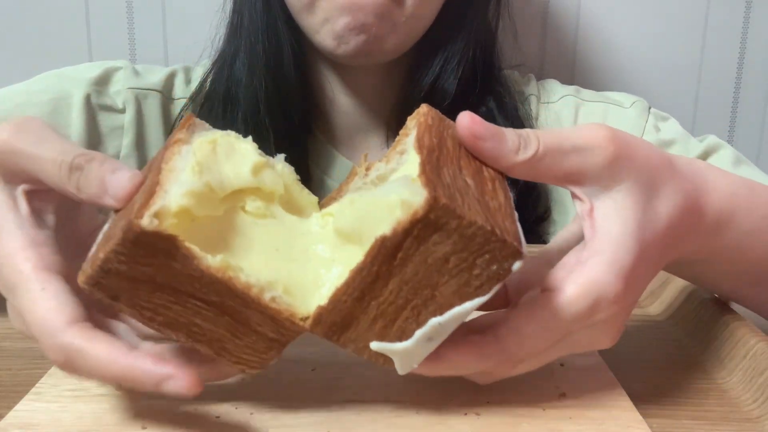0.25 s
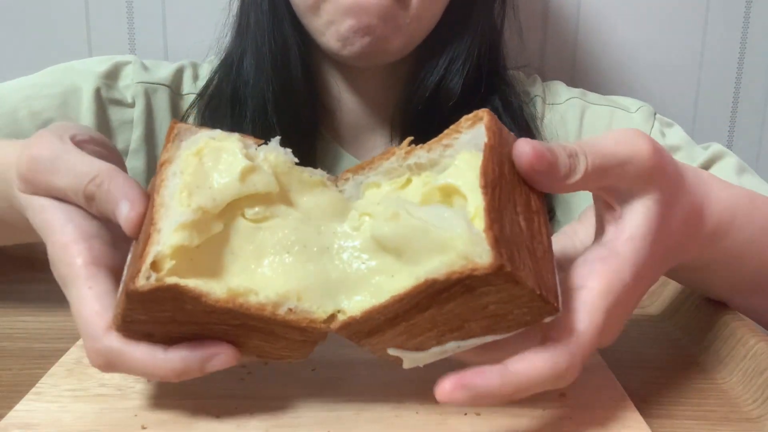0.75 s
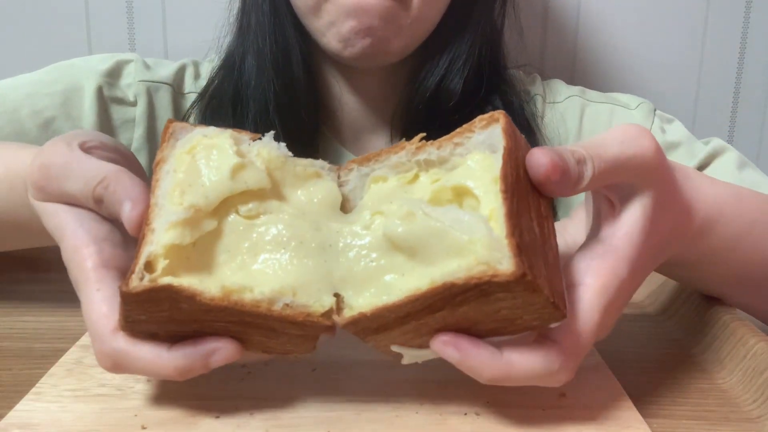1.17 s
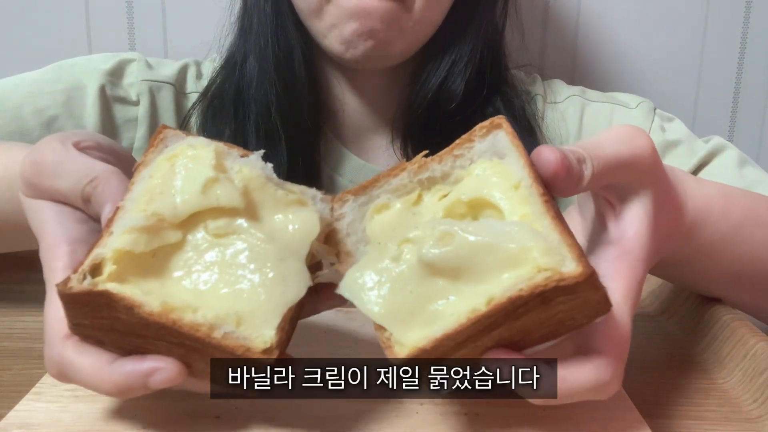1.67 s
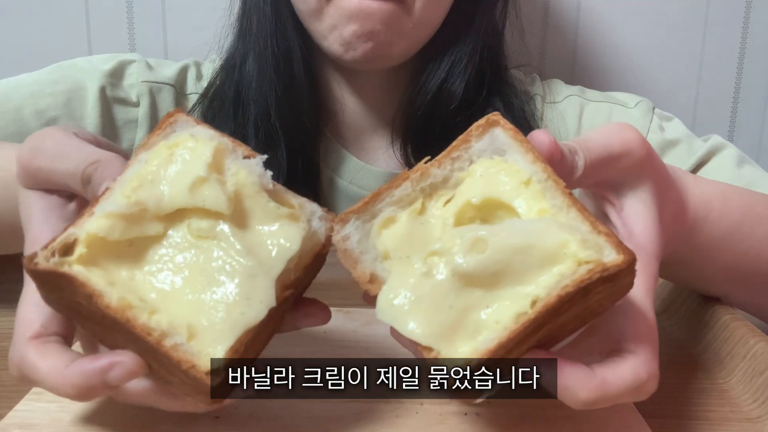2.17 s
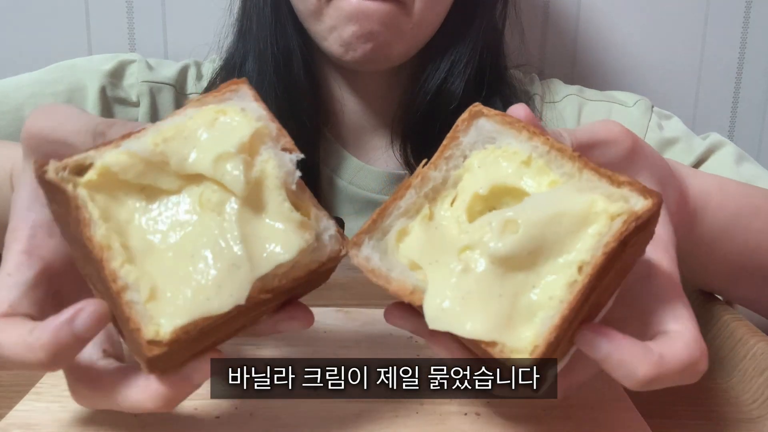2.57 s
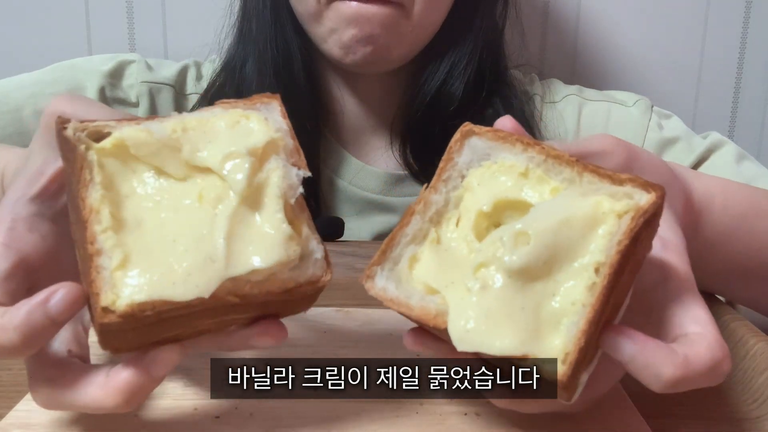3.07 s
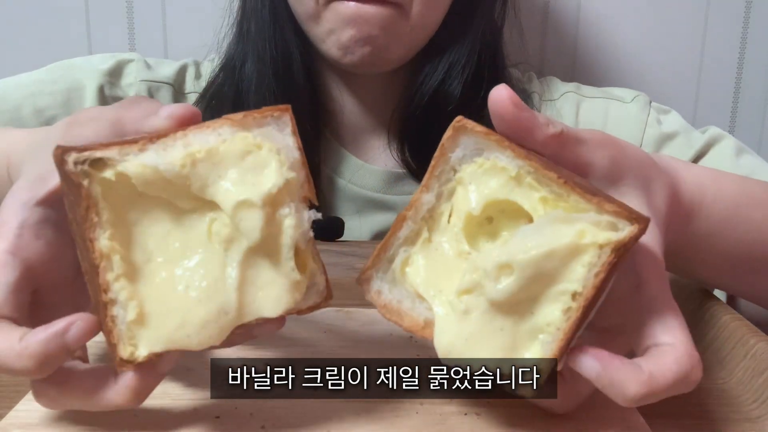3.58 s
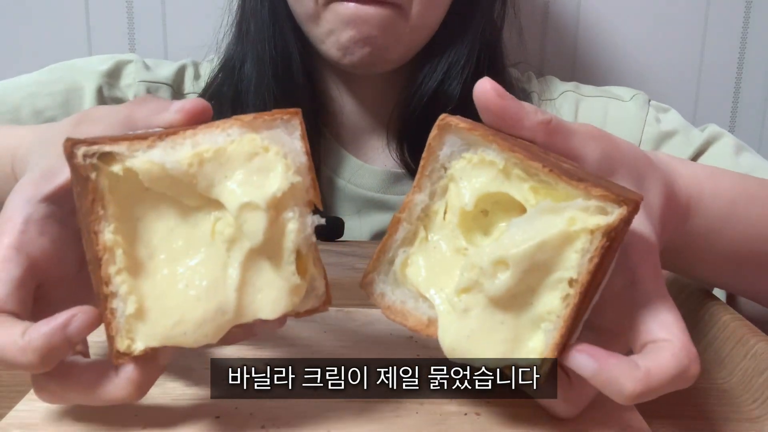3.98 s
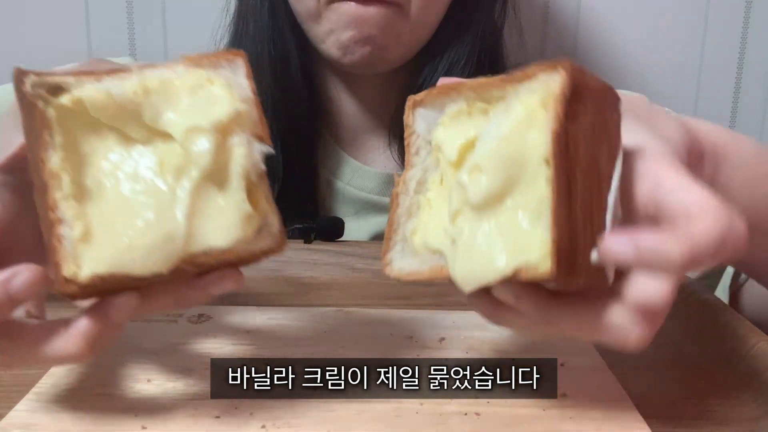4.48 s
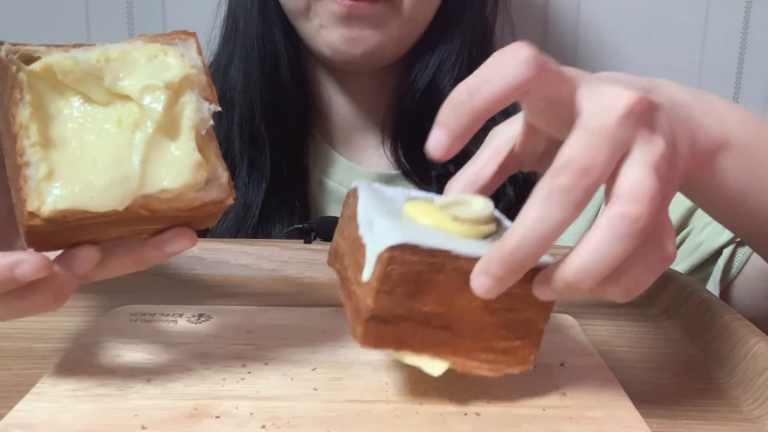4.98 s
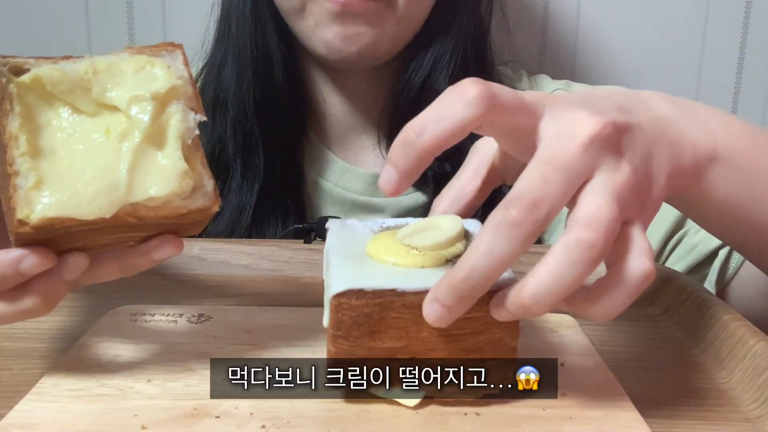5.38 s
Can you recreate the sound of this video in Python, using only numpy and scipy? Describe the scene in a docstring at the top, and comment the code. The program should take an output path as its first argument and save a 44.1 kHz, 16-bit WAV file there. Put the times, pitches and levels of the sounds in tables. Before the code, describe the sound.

Quiet indoor close-up of crisp crust breaking. After a light early click with a soft bump, crackling swells sharply, peaks, and continues in scattered snaps before thinning out. A brief duller crunch comes past three seconds; near the end, fingers slide faintly over crust with two tiny ticks. Very soft, regular clock ticks and low room rumble with thin hiss lie underneath throughout.

```python
"""A quiet room: over a wooden board, close by, a flaky, cream-filled pastry is pulled apart by hand.
Crust snaps and tears are minimum-phase clicks, single or massed; sliding fingers are shaped noise.
A wall clock, ticking about once a second, is a set of damped modes struck by runs of gear blows.
A soft bump is a short sine; deep rumble, a wavering low hum and steady hiss are filtered noise."""
import sys
import numpy as np
from scipy import signal
from scipy.fft import rfft, irfft
from scipy.io import wavfile
from scipy.ndimage import uniform_filter1d

SR = 44100
rng = np.random.default_rng(int(sys.argv[2]) if len(sys.argv) > 2 else 0)


def output_pcm(signal):
    """Save a mono or channel-first signal as 16-bit PCM at the path in sys.argv[1].

    Samples are clipped to [-1, 1] before scaling.
    """
    pcm = np.clip(np.atleast_2d(signal).T, -1, 1) * 32767
    wavfile.write(sys.argv[1], SR, np.round(pcm).astype(np.int16))


def how_loud(loudness_db):
    """Turn decibels into a plain amplitude multiplier (0 dB gives 1, 20 dB gives 10)."""
    steps = np.asarray(loudness_db, float) / 20
    return 10 ** steps


N = 248724  # samples

# Colour that the hollow crust gives every break and the hiss of a slide: f/Hz, level/dB
CRUST_COLOUR = [(250, 15), (750, 8.5), (1600, 3.5), (2100, 1.5), (2600, -10), (3200, 0), (3900, -3),
                (4800, 0), (5800, 0.5), (7500, 0), (10500, -2.5), (16000, -9.5)]


def evened(x):
    """Normalisation: scales a signal to unit rms."""
    return x / np.sqrt(np.mean(x ** 2) + 1e-30)


def curve(rows):
    """Linear interpolation: reads a (t/s, value) table at every sample."""
    s, value = np.transpose(rows)
    return np.interp(np.arange(N) / SR, s, value)


def noise(db_at, size=N):
    """Spectral shaping: Gaussian noise of unit rms, its spectrum weighted by db_at(f/Hz) in dB."""
    hz = np.fft.rfftfreq(size, 1 / SR) + .1  # keeps the logarithm finite at 0 Hz
    white = rfft(rng.standard_normal(size))
    return evened(irfft(white * how_loud(db_at(hz)), size))


def spectrum(points):
    """Spectral envelope: interpolates (f/Hz, level/dB) points on a log-frequency axis."""
    f, db = np.transpose(points)
    return lambda hz: np.interp(np.log(hz), np.log(f), db)


def hump(hz, centre_hz, octaves, low=1):
    """Log-Gaussian resonance in dB: 6 dB down at the given octaves; low < 1 softens the lower side."""
    away = np.log2(hz / centre_hz) / octaves
    return -6 * np.where(away < 0, low, 1) * away ** 2


def ring(modes, colour_db, size):
    """Modal superposition: an impulse sets off exponentially damped sines."""
    hz, db, t60 = np.transpose(modes)[:, :, None]
    t = np.arange(size) / SR
    decay = how_loud(db + colour_db[:, None] - 60 * t / t60)
    return (decay * np.sin(2 * np.pi * hz * t)).sum(0)


def add(mix, s, sound):
    """Linear superposition: mixes a sound in at time s."""
    part = mix[round(s * SR):][:len(sound)]
    part += sound[:len(part)]


def room():
    """Stationary noise with amplitude modulation: rumble, a two-band swelling hum and hiss."""
    # Deep rumble: f/Hz, relative spectral density/dB
    rumble_points = [(1, -5), (5, 8.5), (11, 4), (20, -11), (29, -16), (36, -3), (42, -1), (52, -6),
                     (64, -14), (76, -18.5), (115, -25), (150, -33.5), (220, -74)]
    # Hum, lower then upper band: f/Hz, relative spectral density/dB
    hum_bands = [
        [(130, -29.5), (180, 3.5), (225, 6), (290, 2), (360, -28.5)],
        [(300, -15), (370, 1), (440, 0.5), (540, -5), (680, -27)],
    ]
    # Swelling and sinking of the hum, before waver and band balance: t/s, level/dB
    hum_swell = [(0, -80), (.5, -79), (.9, -72.5), (1.15, -72.5), (1.35, -83.5), (1.6, -74), (2.05, -74),
                 (2.35, -81), (2.75, -77.5), (3.05, -85.5), (3.4, -68), (3.6, -75.5), (3.85, -87),
                 (4.08, -71.5), (4.35, -74), (4.65, -83), (5.35, -81.5), (5.64, -73.5)]
    # Hiss: f/Hz, relative spectral density/dB
    hiss_points = [(90, -43), (150, -10), (300, -9), (520, -15), (900, -18), (2000, -22.5), (4000, -25.5),
                   (6000, -25.5), (9000, -26), (12000, -29.5), (15800, -32)]
    rumble_db, hiss_db = -47.5, -72.5
    upper_db, waver_db = -1.5, 1.5  # upper band against lower; rms waver of each band
    hum = 0
    for band, db in zip(hum_bands, (0, upper_db)):
        waver = noise(lambda hz: -hz * 1.2)  # the steep fall leaves only slow change
        hum_gain = how_loud(curve(hum_swell) + db + waver_db * waver)
        hum = hum + hum_gain * noise(spectrum(band))
    rumble = how_loud(rumble_db) * noise(spectrum(rumble_points))
    return rumble + hum + how_loud(hiss_db) * noise(spectrum(hiss_points))


def clock():
    """Forced vibration: each tick is a run of gear blows ringing the case's modes, with a dry rattle."""
    # Modes of the case, before each beat's colouring: f/Hz, level/dB, t60/s
    case_modes = [(781, -4.5, 0.19), (1047, 1, 0.082), (1330, -10, 0.065), (1393, 0.5, 0.083),
                  (1530, -7.5, 0.034), (2038, -3, 0.061), (2400, -11.5, 0.074), (3490, -6.5, .03),
                  (5030, -7, .025), (5900, -13, .03), (7300, -9, 0.02)]
    # Blows of the gear train in one tick, before random scatter: t/s, level/dB
    gear_blows = [(0, -8), (.0022, -3), (.0044, -3.5), (.0089, -1), (.0133, -2), (.0355, -2.5)]
    # The two alternating beats: level/dB, rattle level/dB (relative), brightening/(dB per octave)
    tick_beat = (-66, -4, 1)
    tock_beat = (-70.5, -0.6, 4.8)
    first_s, every_s = .206, 1.0001
    blow_scatter_db, mode_scatter_db = 3.1, 1.2
    delay_s, gear_db = np.transpose(gear_blows)
    mode_hz = np.transpose(case_modes)[0]
    out, t = np.zeros(N), np.arange(4000) / SR
    for beat in range(6):
        db, rattle_db, bright_db = (tick_beat, tock_beat)[beat % 2]
        blows = rng.standard_normal(4000) * how_loud(-21.0 - 60 * t / 0.16)  # a dense, quickly fading burst of small gear blows
        blow_db = gear_db + blow_scatter_db * rng.standard_normal(len(gear_blows))
        blows[[round(d * SR) for d in delay_s]] += how_loud(blow_db)
        colour_db = bright_db * np.log2(mode_hz / 1400)
        colour_db = colour_db + mode_scatter_db * rng.standard_normal(len(case_modes))
        tick = np.convolve(blows, ring(case_modes, colour_db, size=5000))[:4000]
        # the rattle follows the short-time strength of the blows
        burst = abs(uniform_filter1d(blows ** 2, size=150)) ** .5 * how_loud(-60 * t / 0.6)
        rattle = noise(lambda hz: hump(hz, 3670, 1.0), size=4000) * burst / burst.max()
        tick = tick / np.std(tick[:1500])
        add(out, first_s + beat * every_s, how_loud(db) * (tick + how_loud(rattle_db) * rattle))
    return out


def slides():
    """Friction noise: skin on crust gives a grainy hiss and a hollow band that swell and stop."""
    # Strokes: start t/s, end t/s, hiss level/dB, hiss centre f/Hz, half-width/octaves,
    # peak position/fraction of the stroke, hollow level/dB (levels before the stroke's envelope)
    strokes = [(.26, 0.315, -74.5, 7650, 1.6, 0.6, -84), (0.407, .436, -57.5, 6750, 1.1, .75, -64.5),
               (2.569, 2.647, -82, 4000, 1.3, 0.9, -74.5), (3.364, 3.418, -73.5, 10800, .45, .55, -85),
               (4.419, 4.724, -76.5, 6160, 1.8, 1, -89), (4.688, 4.869, -65.5, 15000, 1.4, 0.36, -65.5),
               (5.524, 5.66, -88, 4000, 1.3, 0.4, -76.5)]
    hollow_hz, hollow_octaves = 1260, 1.43
    grain_db, grain_s = 3, 0.048  # unevenness; strokes longer than grain_s are smoother
    out = np.zeros(N)
    for start, end, db, hz, octaves, top, hollow_db in strokes:
        hiss_colour = lambda f: hump(f, hz, octaves) + spectrum(CRUST_COLOUR)(f)
        hiss = how_loud(db) * noise(hiss_colour, size=32768)
        hollow = how_loud(hollow_db) * noise(lambda f: hump(f, hollow_hz, hollow_octaves), size=32768)
        unevenness = evened(uniform_filter1d(rng.standard_normal(32768), size=130))
        grain = how_loud(grain_db * min(grain_s / (end - start), 1) ** .5 * unevenness)
        u = np.linspace(0, 1, round((end - start) * SR))
        peak_at = np.clip(top, .2, .85)
        stroke = np.interp(u, [0, .12, peak_at, .92, 1], [0.37, 0.57, 0.96, 0.46, 0.24])
        add(out, start, stroke * ((hiss + hollow) * grain)[:len(u)])
    return out


def bump():
    """Windowed oscillation: a half-sine envelope on a low sine, a soft push as the grip shifts."""
    start_s, length_s, peak_db, hz = .404, 0.038, -59.5, 242.4
    out, t = np.zeros(N), np.arange(0, length_s, 1 / SR)
    envelope = np.sin(np.pi * t / length_s)
    add(out, start_s, how_loud(peak_db) * envelope * np.sin(2 * np.pi * hz * t))
    return out


def flake(centre_hz, octaves, chance):
    """Minimum-phase impulse response: one flake's dry click, rippled in colour by its own shape."""
    hz = np.fft.rfftfreq(512, 1 / SR) + 40
    ripple_db = 3.3 * np.interp(np.log(hz / 500), np.linspace(0, 3.5, len(chance)), chance)
    colour_db = spectrum(CRUST_COLOUR)(hz) + hump(hz, centre_hz, octaves, low=0.72) + ripple_db
    log_gain = np.log(how_loud(np.maximum(colour_db, -70)))
    # folding the cepstrum onto positive time makes the click causal
    cepstrum = irfft(log_gain) * np.r_[1, 2 * np.ones(255), 1, np.zeros(255)]
    click = irfft(np.exp(rfft(cepstrum)))[:400]
    return click / abs(click).max()


def snaps():
    """Brittle fracture: a flake snaps, then decaying random impulses are the crumbs rattling."""
    # The loudest snaps: t/s, first click's peak level/dB, centre f/Hz before crust colour,
    # half-width/octaves
    snap_rows = [(0.407, -40, 4840, 1.6), (0.4522, -56, 3000, 1.1), (0.4936, -61, 1960, .6),
                 (0.764, -57, 7390, 1.3), (0.801, -59, 3470, 0.38), (1.1255, -55, 8000, 0.9),
                 (1.146, -54, 5900, 1.2), (1.166, -53, 6280, 0.73), (1.175, -47.5, 5100, 1.1),
                 (1.1896, -37.5, 3800, 1.6), (1.218, -39, 6200, 1.1), (1.226, -45, 4500, 0.99),
                 (1.2352, -31, 4300, 1.25), (1.2442, -43, 3190, 1.6), (1.2525, -41.5, 4040, .8),
                 (1.2601, -31.5, 3720, .55), (1.2677, -39.5, 2480, 1), (1.2704, -39, 3810, 1.8),
                 (1.2975, -40.5, 5940, 0.88), (1.3083, -49, 3930, 0.86), (1.3335, -45.5, 6000, 1.5),
                 (1.3365, -48.5, 4500, 0.65), (1.398, -59, 5000, 0.69), (1.42, -52, 4310, 1),
                 (1.441, -50.5, 4700, 0.94), (1.46, -53.5, 4910, 1.2), (1.5624, -42.5, 2700, 1.3),
                 (1.601, -57, 1900, 0.96), (1.61, -34, 2120, 1.28), (1.614, -42, 3500, 1.7),
                 (1.6255, -47, 3350, 1.7), (1.6388, -53, 1520, 1.2), (1.662, -43, 1320, 0.95),
                 (1.671, -37.5, 3040, 1.6), (1.6976, -47.5, 2890, 1.2), (1.7299, -44.5, 3780, 1.9),
                 (1.7437, -48.5, 5460, 1.7), (1.7588, -54, 7090, 0.88), (1.849, -48, 8700, .4),
                 (1.9308, -52, 3700, .7), (1.9504, -35, 3060, 1.21), (2.0994, -49, 6350, 0.96),
                 (2.2877, -55, 5000, 1.5), (2.2932, -51, 3500, 1.6), (2.6855, -44, 2400, 1.2),
                 (3.0984, -45.5, 7800, 0.84), (3.3118, -40, 1520, 0.96), (3.3213, -48.5, 1140, 0.37),
                 (3.4867, -56, 10860, 0.22), (4.6725, -48.5, 5600, 0.38), (4.7533, -52, 5520, 0.41)]
    crumbs_db, crumbs_spread_db, crumbs_t60_s = -9.5, 2.2, .013  # levels against the snap
    out, t = np.zeros(N), np.arange(800) / SR
    for s, db, hz, octaves in snap_rows:
        # cubing makes a few crumbs stand out
        crumbs = rng.standard_normal(800) ** 3 * how_loud(-60 * t / crumbs_t60_s)
        crumb_gain = how_loud(crumbs_db + crumbs_spread_db * rng.standard_normal())
        breaks = np.r_[1, crumb_gain * crumbs / np.linalg.norm(crumbs)]
        click = flake(hz, octaves, rng.standard_normal(16))
        add(out, s, how_loud(db) * np.convolve(breaks, click))
    return out


def tears():
    """Shot noise: many small flakes, a few larger, break at random while a layer tears."""
    # Tears: loudest t/s, rms level there/dB, build-up/s, dying-away/s, centre f/Hz before
    # crust colour, mean rate/(flakes per s)
    tear_rows = [(1.235, -64, .12, 0.28, 3850, 1200), (1.26, -51, .035, 0.021, 3680, 1650),
                 (1.69, -64.5, .07, 0.046, 3000, 700), (3.314, -58.5, .003, 0.089, 1160, 3400)]
    range_db = 24.5  # climb in the build-up and fall in the dying-away
    out, span = np.zeros(N), 16384
    for top_s, db, rise_s, fall_s, hz, per_s in tear_rows:
        crackle = np.zeros(span)
        for _ in range(12):  # twelve shapes of flake share the rate
            heights = how_loud(1.7 * np.minimum(rng.exponential(1, span), 4))
            heights *= rng.choice([-1, 1], span)
            heights *= rng.random(span) < per_s / 12 / SR
            click = flake(hz, 1.65, rng.standard_normal(16))
            crackle += signal.oaconvolve(heights, click)[:span]
        t = np.arange(-rise_s, fall_s, 1 / SR)[:span]
        away = np.where(t < 0, t / rise_s, t / fall_s)
        envelope = how_loud(db - range_db * abs(away))
        add(out, top_s - rise_s, evened(crackle)[:len(t)] * envelope)
    return out


def scene():
    """Superposition of direct sound and early reflections of the breaks, with all other sources."""
    # Reflections off the board and hands: delay t/s, level/dB
    reflections = [(.00065, -14), (.0014, -56), (.0036, -16)]
    crust = snaps() + tears()
    near = crust.copy()
    for delay, db in reflections:
        add(near, delay, how_loud(db) * crust)
    return (near + slides() + bump() + clock() + room())[None]


def low_pass(x):
    """Removes everything above the highest recorded frequency."""
    return signal.sosfilt(signal.butter(12, 16430, fs=SR, output="sos"), x)


def record(dry):
    """Band limitation: a linear-phase low-pass filter at 15.8 kHz ends the treble."""
    edge = signal.firwin(511, 15800, window=("kaiser", 5), fs=SR)
    mix = signal.oaconvolve(dry, edge[None], "same")
    return low_pass(mix)


dry = scene()
out = record(dry)
output_pcm(out)
```